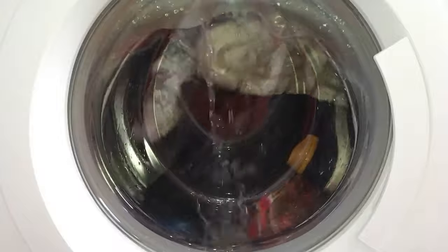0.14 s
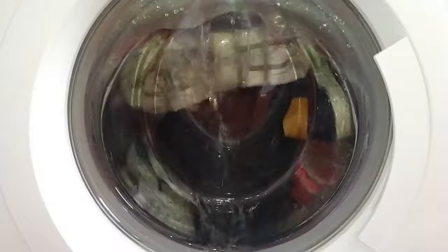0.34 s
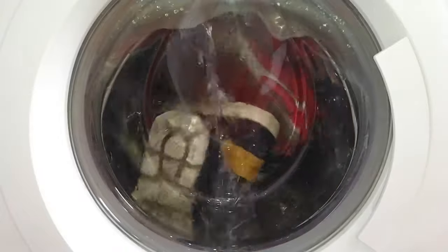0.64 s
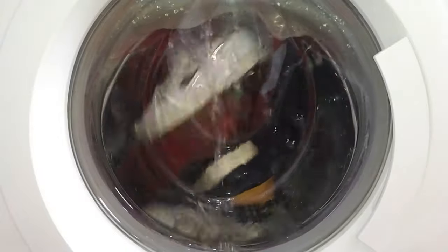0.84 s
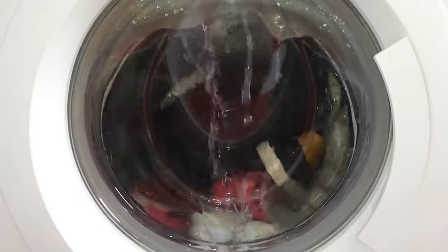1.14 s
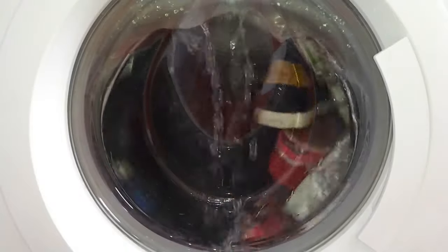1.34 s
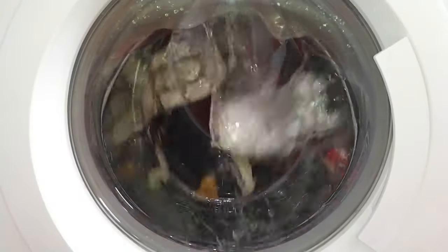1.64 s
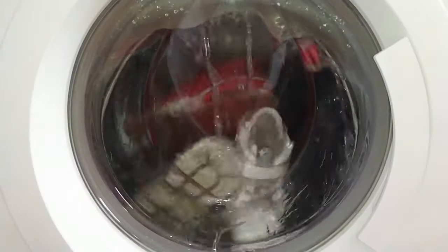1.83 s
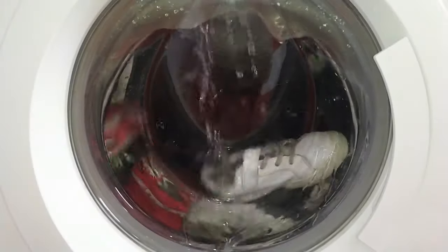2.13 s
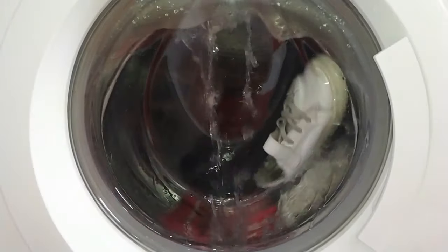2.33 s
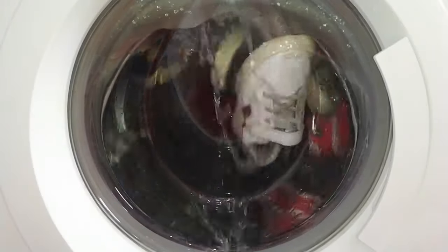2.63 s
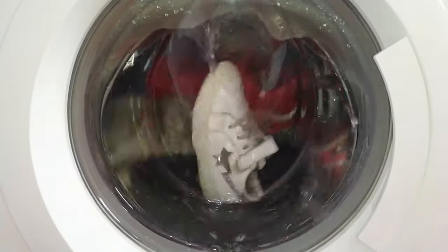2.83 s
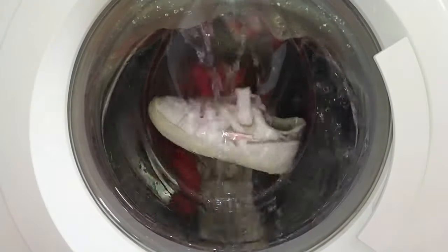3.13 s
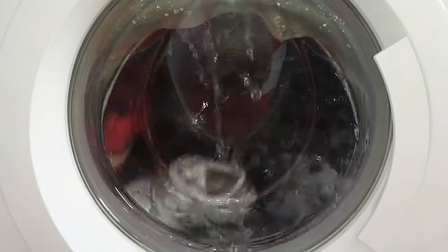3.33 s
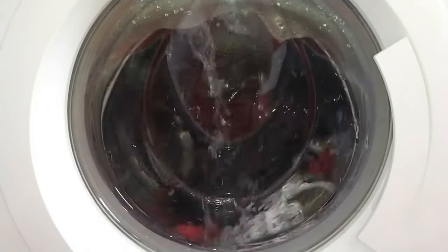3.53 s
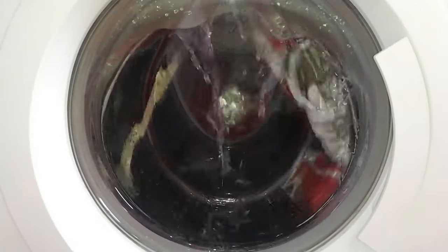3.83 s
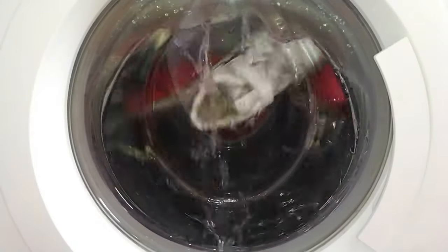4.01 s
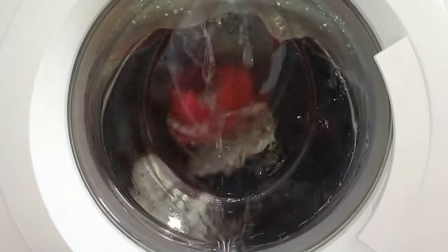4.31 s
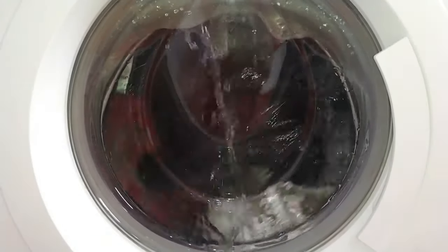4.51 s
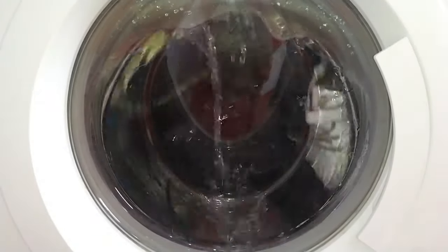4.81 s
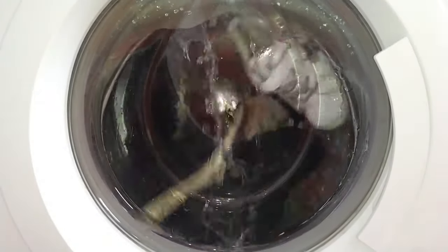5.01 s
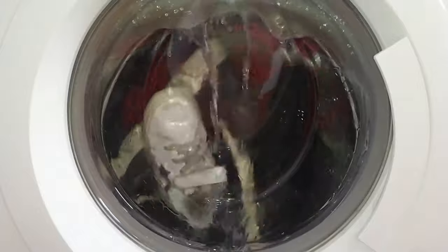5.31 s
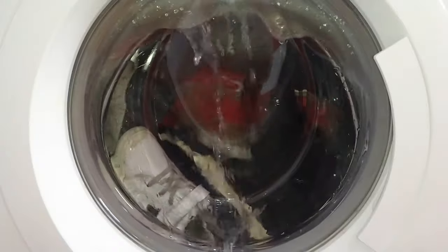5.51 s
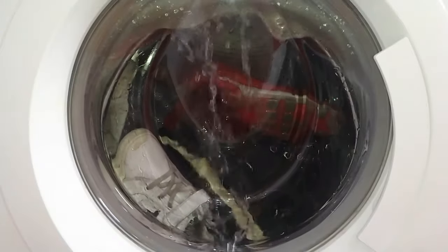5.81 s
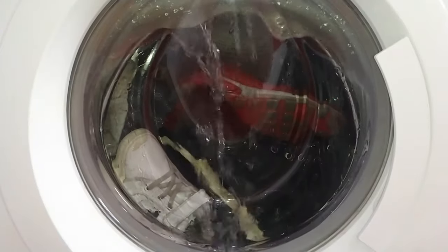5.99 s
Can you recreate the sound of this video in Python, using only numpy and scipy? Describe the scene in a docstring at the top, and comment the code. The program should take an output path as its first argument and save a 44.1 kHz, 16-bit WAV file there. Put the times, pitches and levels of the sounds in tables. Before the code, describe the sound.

A front-loading washing machine tumbles wet shoes in a small hard room. Irregular hollow thuds, some heavy and booming, others light clacks in clusters, land on the sheet-metal drum. Between them the load rumbles and water sloshes and washes, with a thin trickle on the door glass and brief splashes. A low pump hum runs throughout. Stirring eases near the end. Close stereo microphone, machine slightly to the right.

```python
"""Wet shoes drop onto the drum of a front-loading washer: modal synthesis of its sheet-metal panels.
The load rumbles, sloshes and washes as shaped noise between landings, and some splashes burst out.
A water jet trickles on the door glass as noise and droplet grains; a pump hums as a sum of partials.
A drive hisses. Two close ports in a small hard room hear the machine a little to the right."""
import sys
import numpy as np
from scipy import signal
from scipy.fft import rfft, irfft, next_fast_len
from scipy.io import wavfile
from scipy.ndimage import uniform_filter1d, map_coordinates

SR = 44100
rng = np.random.default_rng(int(sys.argv[2]) if len(sys.argv) > 2 else 0)


def persist_wave(psi):
    """Save psi, clipped to +-1, as 16-bit WAV."""
    counts = np.round(np.clip(psi, -1, 1) * 32767).astype(np.int16)
    wavfile.write(sys.argv[1], SR, np.atleast_2d(counts).T)


N = 271215

# Shoes landing: [t/s, level/dB, hardness (level of the upper modes)/dB, sole slap/dB,
# lean of the boom toward its higher modes/(dB per octave)]
LANDINGS = [(0.142, -41, 12.5, -19, 5), (0.3328, -40, -2, -9, 14), (0.4868, -12.5, -7.5, -32, 6),
            (.522, -26.5, -1, -30, 0), (0.627, -23.5, -5, -26, 0), (0.646, -31.5, 2, -20, 6),
            (0.659, -35.5, -16, -24, 23), (0.6803, -27, -9, -19, 7), (0.705, -31, -12, -25, 3),
            (0.726, -33, -12, -25, 5), (0.746, -33, -9, -24, 6), (0.768, -37.5, 13.5, -22, 2),
            (0.868, -34.5, 11.5, -21, 2), (0.886, -38, 4, -18, 7), (1.011, -30.5, 10, -3, 10.5),
            (1.022, -30.5, 8, -14, 10.5), (1.045, -28, -23, -24, -7), (1.416, -4.5, -13, -15, 6),
            (1.489, -15.5, -12, -33, -7.5), (1.848, -21, -13.5, -12, 3.5), (1.912, -28, -8, -11, 4),
            (2.1963, -27.5, -22, -15, -1), (2.295, -11, -9, -25, 1.5), (2.329, -21, -26, -30, -7),
            (2.6417, -25, -4, -37, 6), (2.675, -28, 1, -30, 4), (2.697, -33, 7.5, -26, 3),
            (2.7257, -20, -9.5, -30, 2), (2.7922, -25, -18, -19, -3), (2.88, -36, 2, -17, -10),
            (3.424, -8, -8.5, -13, 2.5), (3.46, -16.5, -4, -23, 0), (3.535, -17.5, -13, -31, -5),
            (3.5878, -32.5, -22, -25, 5), (3.7181, -39.5, 5, -17, 12), (3.9399, -26.5, -5, -11, 4.5),
            (3.9946, -26.5, -12, -18, 2), (4.2227, -13, -17, -31, -4), (4.334, -22.5, -10, -30, -8),
            (4.5237, -8.5, -3.5, -4.5, 3), (4.6107, -18.5, -10, -28, -4), (4.831, -36, 12.5, -5, -11),
            (4.95, -30, -27, -16, -14), (4.998, -37, 12, -8, -2), (5.009, -32.5, 6, -6, -6),
            (5.0265, -22, -3, -16, -8.5), (5.065, -37, 4, -20, 8), (5.102, -21.5, -6, -32, 1.5),
            (5.125, -28.5, -7, -24, -4), (5.1506, -26, -3.5, -23, -4), (5.314, -12, -21, -30, -0.5),
            (5.4127, -21.5, -39, -27, -12), (5.559, -30, -9, -28, 2), (5.8268, -30, -6, -24, -4.5)]
# Cabinet and drum modes: [f/Hz, relative level/dB, t60/s, polarity at the microphone]
PANEL_MODES = [(40.7, -14.5, 0.2, 1), (51.4, -33.5, 0.41, 1), (75.4, 0.5, 0.24, 1), (86.3, -2.5, 0.1, -1),
               (90.4, 1.5, 0.026, 1), (112.8, -3.5, 0.22, 1), (145.2, -13, 0.28, -1),
               (173.4, -16.5, 0.36, -1), (197.7, -21, 0.54, 1), (258.7, -6, 0.42, 1), (301.9, 1.5, 0.22, 1),
               (313.2, 1, 0.23, 1), (370.6, -2.5, 0.26, 1), (390.8, -6, 0.216, 1), (410.5, 9.5, 0.045, 1),
               (433, 5, 0.083, 1), (508.7, -2, 0.28, 1), (554.2, -10, 0.3, 1), (600, -9, 0.11, 1),
               (698, -15, 0.063, 1), (838, -13, 0.14, 1)]
# Colour of the sole slap: [f/Hz, relative level/dB]
SLAP_COLOUR = [(300, 6.5), (700, -22), (1400, 0), (3000, -2), (4000, -12.5), (5200, -16), (9800, -19),
               (15000, -56)]
# Colour of the tub water thrown by a landing: [f/Hz, relative level/dB]
SURGE_COLOUR = [(100, -24), (180, 9), (400, 10.5), (800, -8.5), (2000, -11), (5000, -40), (9000, -63)]
CREST_S = .0055  # from first contact to the full swing of the low modes
CONTACT_S, SOFTER = .0007, .5  # rise of a heavy landing; slowing of lighter ones, dB per dB
SLAP_APART, RIPPLE_DB = .7, 1.8  # part of the slap that differs by port; unevenness of its colour


def thuds():
    """Modal impact: small panels ring at once, big ones swell to a crest, noise slaps and surges."""
    out, t = np.zeros((2, N + SR)), np.arange(SR // 2) / SR
    hz, mode_db, t60, polarity = np.transpose(PANEL_MODES)[:, :, None]
    upper = hz > 230
    octaves = np.log2(hz / 95)
    decay = np.sign(polarity) * amp(mode_db - 60 * np.clip(t - CREST_S * ~upper, 0, 1) / t60)
    swell = np.sin(np.pi / 2 * np.clip(t / CREST_S, 0, 1)) ** 1.2
    crest = CREST_S + .0056 + .0027 * octaves  # higher modes crest a little later
    boom = np.cos(2 * np.pi * hz * (t - crest)) * swell
    spread_db = np.where(upper, 3, 1)  # where the shoe lands matters more to the small panels
    crack = amp(-60 * t / 0.023)
    thrown = amp(-28.5 - 60 * t / 0.33)  # water thrown up after the crack
    slap_envelope = (crack + thrown) * np.clip(t * SR / 14, 0, 1)
    surge_envelope = amp(-60 * t / 0.42) * (1 - np.exp(-t / 0.026))
    ripple_knots = np.log(np.geomspace(500, 15000, 16))
    for start_s, db, hard_db, slap_db, lean_db in LANDINGS:
        shared, wave, *own = rng.standard_normal((4, len(t)))
        shared[14] = 6  # the snap of first contact
        slap_noise = shared + SLAP_APART * np.array(own)
        ripple_db = RIPPLE_DB * rng.standard_normal(16)  # each slap has its own uneven colour

        def slap_response(f):
            """Linear filtering by the mean slap colour with a random ripple."""
            return amp(along(SLAP_COLOUR, f) + np.interp(np.log(f + 1), ripple_knots, ripple_db))

        contact_s = CONTACT_S * amp(SOFTER * max(-9 - db, 0))
        gain_luck, pitch_luck = rng.standard_normal((2, len(PANEL_MODES), 1))
        detuned_hz = hz * (1 + .012 * pitch_luck)  # the wet load detunes the small panels
        knock = np.sin(2 * np.pi * detuned_hz * t) * (1 - np.exp(-t / contact_s))
        excitation_db = np.where(upper, hard_db - 14.5, lean_db * octaves) + spread_db * gain_luck
        ring = amp(excitation_db) * decay * np.where(upper, knock, boom)
        slap = slap_envelope * unit(filtered(slap_noise, slap_response))
        surge = surge_envelope * unit(filtered(wave, lambda f: amp(along(SURGE_COLOUR, f))))
        landing = amp(-4.0) * ring.sum(axis=0) + amp(slap_db - 4.0) * slap + amp(hard_db - 16.5) * surge
        out[:, round(start_s * SR):][:, :len(t)] += amp(db) * landing
    return out[:, :N]


# Load dragging on the drum between landings: [t/s, level/dB]
DRAG_LEVEL = [(0, -53.5), (.3, -48), (.6, -42), (1.15, -41), (1.379, -46.5), (1.65, -41), (2.151, -49),
              (2.55, -41.5), (2.85, -42.5), (3.15, -55), (3.4, -45.5), (3.85, -39.5), (4.3, -39.5),
              (4.48, -43.5), (4.72, -32.5), (4.95, -41), (5.5, -41.5), (5.85, -55), (6.15, -54)]
# Colour of the rumble: [f/Hz, relative level/dB]
RUMBLE_COLOUR = [(15, -52), (30, -8), (50, -0.5), (92, 4), (114, -4), (150, -0.5), (200, -16), (236, -58),
                 (260, -6), (340, -28), (570, -120)]
AFTER_DB, AFTER_GROWS = -19, 0.99  # rolling on after a landing: offset; dB per dB of landing
AFTER_RISE_S, AFTER_T60_S = 0.032, 0.54


def load_rumble(jostle):
    """Rough contact as shaped noise: drag and the rolling after landings add in power."""
    drag_db = np.interp(np.arange(N) / SR, *np.transpose(DRAG_LEVEL))
    land_s, land_db = np.transpose(LANDINGS)[:2]
    rolling = swells(land_s, AFTER_DB + AFTER_GROWS * land_db, AFTER_RISE_S, AFTER_T60_S)
    gain = np.sqrt(amp(drag_db) ** 2 + rolling)
    return gain * amp(2.0 * jostle) * rush(RUMBLE_COLOUR, patchy_db=-0.05)


# How hard the drum stirs the load: [t/s, relative level/dB]
STIRRING_LEVEL = [(0, -5), (.2, -5.5), (.36, 1.5), (1.2, 2.5), (2.0, 2), (2.85, 0.5), (3.1, 0), (3.4, 1.5),
                  (4.4, 1.5), (5.15, 0), (5.5, -3.5), (5.85, -8), (6.15, -8.5)]


def stirring_db():
    """Slow modulation: the level curve of stirring, linear between its points."""
    return np.interp(np.arange(N) / SR, *np.transpose(STIRRING_LEVEL))


# Wet load flopping into the water: [t/s, slosh level/dB, wash level/dB]
LOAD_FLOPS = [(.33, -40.5, -67), (.62, -33.5, -44), (1.02, -42, -46), (1.42, -47, -43), (1.83, -41, -55),
              (2.22, -49, -61), (2.65, -38, -49), (2.75, -45, -46), (3.18, -63, -46.5), (3.39, -37, -48),
              (3.72, -40, -68), (3.87, -41.5, -55), (4.2, -38.5, -62), (4.84, -48, -50),
              (4.998, -33.5, -44), (5.09, -45, -59)]
# Colour of the slosh: [f/Hz, relative level/dB]
SLOSH_COLOUR = [(120, -47), (200, 2.5), (237, -12), (301, 4.5), (344, -4.5), (408, 1), (456, -8),
                (515, -0.5), (608, -9.5), (690, -5.5), (750, -16), (980, -64), (1650, -120)]
FLOP_RISE_S, FLOP_T60_S = 0.0088, 0.6
SLOSH_DB = -47.5  # where the stirring curve is at 0 dB


def slosh_and_bumps(jostle, clumps):
    """Amplitude-modulated noise and damped sines: water sloshes and small things bump."""
    flop_s, flop_db, _ = np.transpose(LOAD_FLOPS)
    flops = clumps * swells(flop_s, flop_db, FLOP_RISE_S, FLOP_T60_S)
    gain = np.sqrt(amp(SLOSH_DB + stirring_db()) ** 2 + flops)
    slosh = amp(0.17 * jostle + 0.96 * wobble(11.0)) * rush(SLOSH_COLOUR, patchy_db=-0.47)
    bumps = drops(per_s=70, hz=404, cycles=6.8, spread_db=5.5, size=2048).mean(axis=0)
    return gain * (slosh + amp(-12) * bumps)


# Colour of the wash: [f/Hz, relative level/dB]
WASH_COLOUR = [(440, -50), (750, -1), (1000, 3.5), (1280, -0.5), (1460, 1.5), (1730, -5), (2030, 2),
               (2440, -6.5), (3600, -15.5), (4680, -61), (7920, -120)]
WASH_DB, WASH_FOLLOWS = -52.5, 1.24  # at 0 dB of stirring; dB per dB of stirring


def wash_through_load(clumps):
    """Turbulence as shaped noise with damped-sine drops: water washes through the load."""
    flop_s, _, flop_db = np.transpose(LOAD_FLOPS)
    flops = clumps * swells(flop_s, flop_db, FLOP_RISE_S, FLOP_T60_S)
    gain = np.sqrt(amp(WASH_DB + WASH_FOLLOWS * stirring_db()) ** 2 + flops)
    droplets = drops(per_s=300, hz=1360, cycles=3.6, spread_db=1.0, size=256)
    return gain * (rush(WASH_COLOUR, patchy_db=2.0) + amp(-11) * droplets)


# Colour of the jet on the door glass: [f/Hz, relative level/dB]
JET_COLOUR = [(410, -46), (700, -38), (1330, -19), (1700, -2.5), (1810, -8), (2260, -5.5), (2450, -3),
              (4290, -11.5), (4640, -8.5), (6100, -10), (11300, -11.5), (15000, -25.5), (15800, -41)]
JET_DB, JET_FOLLOWS = -53, 0.41  # at 0 dB of stirring; dB per dB of stirring


def water_jet():
    """Turbulence as shaped noise with damped-sine droplets: the jet trickles on the glass."""
    droplets = drops(per_s=1200, hz=4130, cycles=6.1, spread_db=11.0, size=256)
    jet = rush(JET_COLOUR, patchy_db=2.08) + amp(-27.5) * droplets
    return amp(JET_DB + JET_FOLLOWS * stirring_db() + 0.15 * wobble(15)) * jet


# Splashes of single drops and sheets: [t/s, level/dB, centre f/Hz, spread as log ratio, t60/s]
SPLASH_BURSTS = [(0.181, -44, 5600, 0.13, 0.028), (0.689, -43, 6800, 0.37, .03), (.63, -51, 1500, .6, .25),
                 (1.01, -39, 1590, 0.4, 0.11), (1.776, -47, 6000, 0.64, 0.53), (1.7858, -40, 5000, .6, .03),
                 (1.797, -41, 5250, 0.63, 0.078), (1.8126, -40.5, 3970, 0.88, 0.07),
                 (1.825, -43, 5000, 0.48, 0.027), (1.8497, -46, 9500, .2, .04),
                 (2.1211, -47, 12000, 0.24, 0.023), (2.131, -48, 9500, .1, .04),
                 (2.1994, -53, 14000, .2, .03), (2.3381, -49, 10300, .15, .03), (2.837, -50, 3370, .5, .04),
                 (3.0294, -49, 12000, 0.43, 0.026), (3.37, -39, 9000, 1.1, .03),
                 (4.525, -45.5, 3000, 0.76, 0.48), (4.6718, -39, 8950, 0.48, 0.028),
                 (4.999, -47, 1590, .6, 0.18), (5.1, -51, 1300, .6, 0.16), (5.2629, -46, 5000, 0.35, 0.022),
                 (5.3128, -45, 10200, 0.42, 0.032), (5.7194, -47, 11300, 0.33, 0.076)]
SPLASH_RISE = .04  # rise as a share of t60


def splashes():
    """Band-limited noise bursts with exponential decay: each splash has its own centre frequency."""
    out, t = np.zeros((2, N + SR)), np.arange(SR // 4) / SR
    for start_s, db, hz, spread, t60 in SPLASH_BURSTS:
        band = lambda f: np.exp(-(np.log((f + 1) / hz) / spread) ** 2)
        spray = unit(filtered(rng.standard_normal((2, len(t))), band))
        envelope = amp(db - 60 * t / t60) * (1 - np.exp(-t / (SPLASH_RISE * t60)))
        out[:, round(start_s * SR):][:, :len(t)] += envelope * spray
    return out[:, :N]


SQUEAK_S, SQUEAK_LONG_S, SQUEAK_DB = 0.55, 0.012, -56  # start, duration, level
SQUEAK_FROM_HZ, SQUEAK_TO_HZ = 12000, 9200


def squeak():
    """Frequency glide: one thin falling chirp, roughened by smoothed noise."""
    out, t = np.zeros((2, N)), np.arange(SR // 4) / SR
    u = np.clip(t / SQUEAK_LONG_S, 0, 1)
    turns = np.cumsum(SQUEAK_FROM_HZ + (SQUEAK_TO_HZ - SQUEAK_FROM_HZ) * u) / SR
    envelope = np.sqrt(np.abs(np.sin(np.pi * u))) * (u < 1)
    roughness = 4.1 * uniform_filter1d(rng.standard_normal((2, len(t))), size=24)
    chirp = envelope * np.sin(2 * np.pi * turns) * roughness
    out[:, round(SQUEAK_S * SR):][:, :len(t)] += amp(SQUEAK_DB) * chirp
    return out


# Pump hum at twice the mains rate and overtones: [f/Hz, mean level before the port balance/dB]
HUM_PARTIALS = [(100.1, -47.5), (200.2, -64.5), (300.3, -61.5), (500.5, -77)]
# Whirr resonances of the pump housing: [f/Hz, width/Hz, relative level/dB]
WHIRR_MODES = [(1951, 11, -66), (2114, 38, -64), (2580, 50, -69), (2401, 19, -64), (2486, 28, -66),
               (2540, 17, -91), (2893, 17, -68), (3082, 59, -70), (4160, 46, -98)]


def pump():
    """Additive synthesis of unsteady hum partials; noise rings in the housing resonances."""
    t = np.arange(N) / SR
    hum = np.zeros(N)
    for hz, db in HUM_PARTIALS:
        phase = 2 * np.pi * hz * t + 0.0018 * hz * wobble(4.12)
        hum += np.sqrt(2) * amp(db + 2.0 * wobble(6.8)) * np.sin(phase)

    def housing(f):
        """Resonance: a sum of complex poles, each scaled by its width."""
        return sum(amp(db) * np.sqrt(w * SR / np.pi) / (w + 2j * (f - c)) for c, w, db in WHIRR_MODES)

    whirr = filtered(rng.standard_normal((2, N)), housing)
    return hum + amp(1.8 * wobble(6.9)) * whirr


# Colour of the drive hiss: [f/Hz, relative level/dB]
DRIVE_COLOUR = [(7000, -18), (8800, -5), (9600, 10), (10400, -5), (12000, -46)]


def drive_hiss():
    """Shaped noise of slowly fluctuating level."""
    return amp(-66 + 1.5 * wobble(11.0)) * rush(DRIVE_COLOUR, patchy_db=3.0)


# Decay of the small hard room: [f/Hz, t60/s]
ROOM_DECAY = [(60, 0.64), (300, 1), (2000, 0.25), (10000, 1)]


def room(x):
    """Reverberation by convolution: each frequency of a noise tail decays at its own rate."""
    hz, t, z = signal.stft(rng.standard_normal((2, SR // 2)), SR, nperseg=256)
    tail = signal.istft(z * amp(-60 * t / along(ROOM_DECAY, hz)[:, None]), SR, nperseg=256)[1]
    # A weak bass in the tail keeps the bass alike at both ports
    tail = filtered(tail, lambda f: f ** 2 / (f ** 2 + 250 ** 2))
    delayed = np.pad(x, (300, 0))[None]
    return signal.fftconvolve(delayed, tail / np.linalg.norm(tail[0]), axes=1)[:, :N]


# Likeness of diffuse noise at the two ports: [f/Hz, coherence]
PORT_LIKENESS = [(60, .99), (130, .92), (290, .84), (640, .3), (1400, .08), (2600, .3), (7000, .2),
                 (15000, .2)]


def rush(spectrum, patchy_db):
    """Partially coherent noise: a stereo pair of rms 1 with time-frequency patches of random gain."""
    z = signal.stft(rng.standard_normal((2, N)), nperseg=512)[2]
    field = uniform_filter1d(rng.standard_normal(z.shape[1:]), size=6, axis=0)
    field = uniform_filter1d(field, size=8, axis=1)
    pair = signal.istft(z * amp(patchy_db * unit(field)), nperseg=512)[1][:, :N]

    def mid_side(hz):
        """Coherence set by the power balance of mid and side."""
        angle = np.arccos(np.clip(along(PORT_LIKENESS, hz), -1, 1)) / 2
        return amp(along(spectrum, hz)) * [np.cos(angle), np.sin(angle)]

    mid, side = filtered(pair, mid_side)
    return unit(np.array([mid + side, mid - side]))


def drops(per_s, hz, cycles, spread_db, size):
    """Granular synthesis: damped sines of a few cycles at random moments and sides, scaled to rms 1."""
    when, pitch, weight, side = rng.random((int(per_s * N / SR), 4)).T[:, :, None]
    k = np.arange(size)
    f = hz * 4 ** (pitch - .5)  # within an octave either way
    level = amp(-spread_db * np.log(np.clip(weight, .01, 1)))
    grain = level * np.sin(2 * np.pi * f * k / SR) * np.exp(-k * f / SR / cycles)
    at = ((when * N).astype(int) + k).ravel()
    ports = [np.bincount(at, (grain * np.sqrt(g)).ravel(), N)[:N] for g in (side, 1 - side)]
    return unit(np.array(ports))


def swells(times, db, rise_s, t60_s):
    """Power addition of envelopes that rise softly and decay exponentially."""
    t = np.clip(np.arange(N) / SR - np.asarray(times)[:, None], 0, None)
    envelopes = amp(np.asarray(db)[:, None] - 60 * t / t60_s) * (1 - np.exp(-t / rise_s))
    return np.sum(envelopes ** 2, axis=0)


def wobble(rate):
    """Random modulation: a smooth curve through rate random knots a second."""
    return map_coordinates(rng.standard_normal(int(N * rate / SR) + 4), [np.arange(N) * rate / SR])


def filtered(x, response):
    """Linear filtering: the spectrum of x times a complex frequency response."""
    m = next_fast_len(x.shape[-1] + 8192)
    return irfft(rfft(x, m) * response(np.fft.rfftfreq(m, 1 / SR)), m)[..., :x.shape[-1]]


def along(points, hz):
    """Logarithmic frequency scale: interpolation of (f, value) points."""
    f, v = np.transpose(points)
    return np.interp(np.log(hz + 1), np.log(f + 1), v)


def amp(db):
    """Decibel law: the amplitude gain of a level."""
    return 10 ** (np.asarray(db) / 20)


def unit(x):
    """Power normalisation: x scaled to rms 1."""
    return x / np.sqrt(np.mean(x ** 2) + 1e-20)


LAG_S = 9.5 / 44100  # the left port hears the treble this much later
DOOR_HZ, BASS_LAG = 800, .6  # around and below this the whole cabinet sounds; lag share in the bass


def scene():
    """Superposition of all sources, with interaural-like lag: the right port hears them first."""
    jostle = wobble(27)
    clumps = unit(amp(2.9 * wobble(40))) ** 2  # a flop comes in lumps of water
    hits = thuds()
    balanced = (hits + pump()) * amp([[-.6], [.6]])
    load = load_rumble(jostle) + slosh_and_bumps(jostle, clumps) + wash_through_load(clumps)
    near = balanced + amp(-6.0) * room(hits.mean(axis=0)) + load
    near = near + water_jet() + splashes() + squeak() + drive_hiss()

    def port_lag(hz):
        """Phase delay, half the lag late at the left port and half early at the right."""
        share = 1 - (1 - BASS_LAG) / (1 + (hz / DOOR_HZ) ** 4)
        return np.exp(-1j * np.pi * hz * LAG_S * share * np.array([[1], [-1]]))

    return filtered(near, port_lag)


def record(dry):
    """Band limitation: the microphone loses the deepest bass, and nothing is kept above 15760 Hz."""
    lean = signal.sosfilt(signal.butter(4, 47, "highpass", fs=SR, output="sos"), dry)
    return filtered(lean, lambda hz: hz < 15760)


dry = scene()
out = record(dry)
persist_wave(out)
```